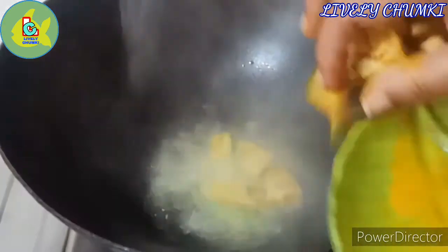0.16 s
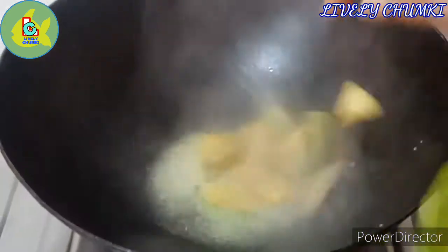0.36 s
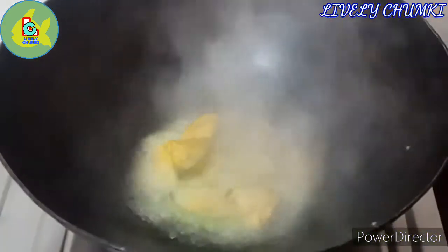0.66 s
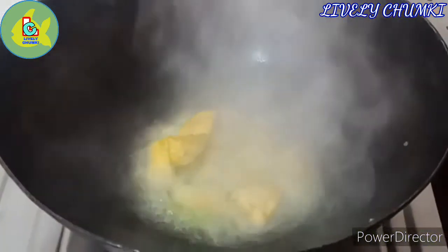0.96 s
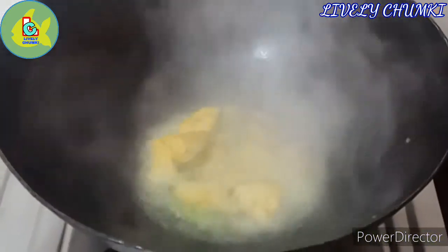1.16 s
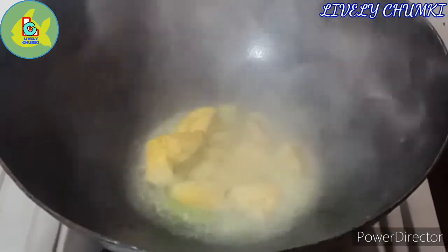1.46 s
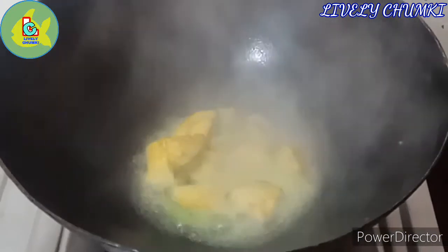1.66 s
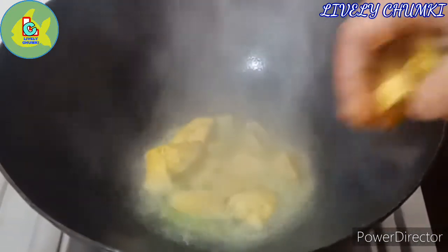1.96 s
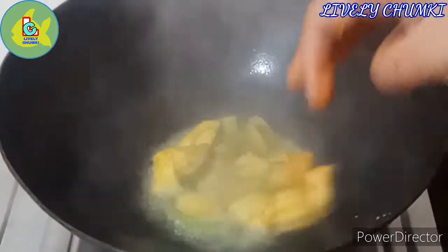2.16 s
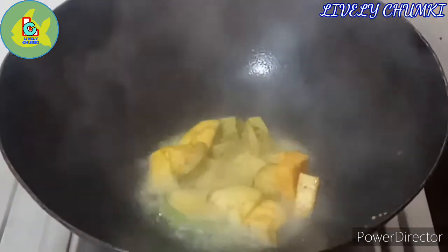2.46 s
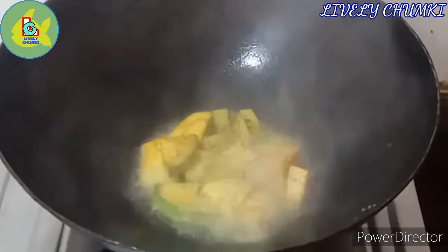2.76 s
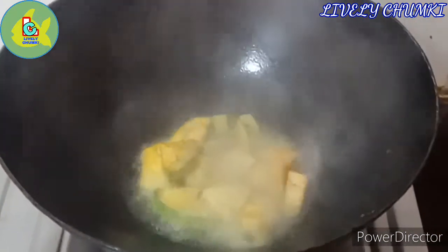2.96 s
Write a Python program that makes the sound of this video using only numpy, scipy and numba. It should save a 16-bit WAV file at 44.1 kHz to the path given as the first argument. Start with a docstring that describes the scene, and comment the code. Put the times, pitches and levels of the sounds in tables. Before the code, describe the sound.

Hot oil frying vegetable cubes in a wok, a close, even, high hiss.

```python
"""Vegetables frying in a wok

Vegetable cubes fry in hot oil, close to a phone in a small kitchen. Thousands of steam bubbles
burst and ring each second; the wok colours them and the room smears them into an even hiss
that flares as wet faces meet the oil. One piece lands with a dull knock, and a faint low
rumble comes and goes underneath."""
import sys
import numpy as np
from scipy import signal
from scipy.fft import rfft, irfft, next_fast_len
from scipy.io import wavfile
from numba import njit

SR = 44100
rng = np.random.default_rng(int(sys.argv[2]) if len(sys.argv) > 2 else 0)


def generate_wav(signal):
    """Clip the signal to [-1, 1] and save it as 16-bit WAV at the path in sys.argv[1]."""
    frames = np.transpose(np.atleast_2d(signal))
    scaled = np.clip(frames, -1, 1) * 32767
    pcm = np.round(scaled).astype(np.int16)
    wavfile.write(sys.argv[1], SR, pcm)


N = 136710
ROOM_T60_S = 0.17


def undb(db):
    """Decibels to gain."""
    return 10 ** (np.asarray(db) / 20)


def unit(x):
    """Scale to rms 1."""
    return x / np.sqrt(np.mean(x ** 2))


def curve(rows):
    """Join (seconds, value) points with straight lines."""
    return np.interp(np.arange(N) / SR, *np.array(rows).T)


def swells(rows):
    """Sum of bell-shaped bumps, each given as centre in seconds, half-width in seconds, height."""
    t = np.arange(N) / SR
    return sum(height * np.exp(-((t - centre) / width) ** 2) for centre, width, height in rows)


def shape(x, response):
    """Filter by a response given as a function of frequency."""
    size = next_fast_len(N + 8192)
    hz = np.maximum(np.fft.rfftfreq(size, 1 / SR), 1)
    return irfft(rfft(x, size) * response(hz), size)[..., :N]


def colour(x, hz, db):
    """Equalise through (Hz, dB) points on a log-frequency axis."""
    return shape(x, lambda f: undb(np.interp(np.log(f), np.log(hz), db)))


def wander(rate_hz):
    """Smooth random drift with rms 1."""
    return unit(shape(rng.standard_normal(N), lambda f: np.exp(-2 * (f / rate_hz) ** 2)))


def kitchen(x, wet_db):
    """The small room adds a short diffuse tail, different on each side."""
    t = np.arange(SR // 2) / SR
    tail = rng.standard_normal((2, len(t))) * np.exp(-np.log(1000) * t / ROOM_T60_S)
    tail[:, :8] = 0  # reflections follow the direct sound
    tail /= np.sqrt(np.sum(tail ** 2, axis=1, keepdims=True))
    return x + undb(wet_db) * signal.fftconvolve(x, tail, axes=1)[:, :N]


def scatter(per_second, spread_db=2):
    """Random events across the oil: left and right arrival times, and sizes, mostly small."""
    start = np.flatnonzero(rng.random(N) < per_second / SR) / SR
    left_lag_s = rng.normal(0.00006, 0.00012, len(start))
    strength = np.minimum(rng.exponential(size=len(start)), 6.5)
    return (start + left_lag_s, start), undb(spread_db * strength)


def bursts():
    """Tiny steam pockets snap open, each a single click."""
    arrivals, size = scatter(per_second=28000)
    clicks = size * np.sign(rng.standard_normal(len(size)))
    samples = np.rint(np.array(arrivals) * SR).astype(int) % N
    return unit(np.array([np.bincount(side, clicks, N) for side in samples]))


@njit
def chirps(start, hz, size, t60, rise):
    """Decaying sines whose pitch climbs by the fraction `rise` as they die away."""
    out = np.zeros(N)
    for k in range(len(start)):
        first = int(start[k] * SR) + 1
        for i in range(max(first, 0), min(first + int(t60 * SR), N)):
            age = i / SR - start[k]
            phase = 2 * np.pi * hz[k] * age * (1 + .5 * rise * age / t60)
            out[i] += size[k] * np.exp(-6.9 * age / t60) * np.sin(phase)
    return out


def bubbles():
    """Bubbles ring for a few milliseconds, each at its own pitch."""
    arrivals, size = scatter(per_second=5000)
    hz = rng.uniform(1606, 15240, len(size))
    return unit(np.array([chirps(start, hz, size, t60=0.01, rise=0.12) for start in arrivals]))


def wok(x):
    """The wok's resonances colour the frying."""
    # Each row: pitch in Hz, bandwidth in Hz, level in dB against the incoming hiss.
    resonances = [(413, 7.1, 2.5), (547, 29, 1.5), (657, 26, -0.5), (786, 20, -12), (876, 44, -5.5),
                  (1065, 21, -8), (1470, 36, -3.5), (1815, 15, -19), (2930, 49, -1), (4400, 19, -15)]
    return shape(x, lambda f: 1 + sum(undb(db) / (1 + 2j * (f - hz) / width)
                                      for hz, width, db in resonances))


def flares(hiss):
    """Wet faces meet the oil and a bright band of the hiss flares up."""
    # Each row: peak time in seconds, half-width in seconds, boost in dB.
    boosts = [(.27, .03, 1), (.595, 0.069, 6), (1.66, 0.058, 1), (2.32, .08, 2)]
    centre_hz, half_width_hz = 4260, 1120
    band = shape(hiss, lambda f: np.exp(-((f - centre_hz) / half_width_hz) ** 2))
    return band * (undb(swells(boosts)) - 1)


def sizzle():
    """Bursts and bubbles sound through the wok and the kitchen, surging with the boil."""
    # Tone of the hiss. Each row: frequency in Hz, relative left and right levels in dB.
    tone = [(150, -38.5, -38.5), (455, -39.5, -35.5), (662, -26.5, -28), (1050, -25, -23.5),
            (1460, -25.5, -25.6), (1830, -20, -19.5), (2610, -18.5, -17), (3140, -16.5, -15),
            (3660, -14, -10.5), (4750, -9.5, -9), (5470, -13, -5), (6510, -10.5, 0.4), (7200, -19, -9),
            (8400, -17.5, -21), (9670, -18, -26.5), (11940, -13, -23.5), (13570, -18, -17.5),
            (15170, -7.5, -3), (14700, -9, -6.5)]
    # Strength of the frying. Each row: time in seconds, gain in dB.
    boil = [(0, 1.4), (.27, 1.3), (.36, 0.1), (.56, 1), (.72, 1.3), (1.12, 1.83), (1.3, 0.66), (1.65, 1.06),
            (2.15, 0.75), (2.33, 1.1), (2.55, 0.3), (2.85, -0.5), (3.1, -0.2)]
    # Treble against the body of the hiss. Each row: time in seconds, gain in dB.
    treble = [(0, -2.5), (.25, -0.8), (.45, 0.7), (1, 0.7), (1.7, 0), (2.35, -0.4), (2.65, 2), (2.85, 0.5),
              (3.1, 2.5)]
    # The level dips briefly. Each row: time in seconds, depth in dB.
    dips = [(.088, 4.5), (1.195, 2.5), (2.18, 0.5), (2.478, 2.5), (2.93, 0)]
    level_db, treble_hz, dip_half_width_s = -19, 8300, 0.02
    oil = bursts() + undb(-4.5) * bubbles()
    left, right = wok(kitchen(oil, wet_db=-5.5))
    hz, left_db, right_db = np.array(tone).T
    hiss = unit(np.array([colour(left, hz, left_db), colour(right, hz, right_db)]))
    body = shape(hiss, lambda f: 1 / (1 + (f / treble_hz) ** 10))
    flicker_db = 0.4 * wander(rate_hz=45)
    fizz = (hiss - body) * undb(curve(treble) + flicker_db)
    dip_db = swells([(time, dip_half_width_s, depth) for time, depth in dips])
    surge_db = 0.43 * wander(rate_hz=30)
    return (body + fizz + flares(hiss)) * undb(level_db + curve(boil) - dip_db + surge_db)


def rumble():
    """A faint low rumble swells into soft thuds, nearly alike on both sides."""
    # Tone of the rumble. Each row: frequency in Hz, relative level in dB.
    tone = [(20, -24), (50, -12.5), (72, -11), (92, -5.5), (107, 6), (122, -12.5), (137, -1), (160, -15.5),
            (200, -10), (300, -9.5), (450, -21), (900, -28.5)]
    # Soft thuds. Each row: peak time in seconds, half-width in seconds, level in dB.
    thuds = [(.01, 0.0095, -45), (0.144, 0.034, -48), (0.355, 0.064, -52), (0.468, 0.036, -49.5),
             (1.053, 0.021, -63), (1.4, .04, -58), (1.83, 0.015, -47), (1.946, 0.013, -49),
             (2.068, 0.016, -50.5), (2.308, 0.095, -49.5), (2.59, 0.011, -50), (2.786, 0.072, -53),
             (2.935, 0.038, -53.5)]
    bed_db, side_db = -62, -14.5
    mid, side = unit(colour(rng.standard_normal((2, N)), *np.array(tone).T))
    thud_power = swells([(time, width, undb(db) ** 2) for time, width, db in thuds])
    envelope = np.sqrt(undb(bed_db) ** 2 + thud_power)
    return envelope * (mid + undb(side_db) * np.array([side, -side]))


def knock():
    """A soft cube strikes the wok, whose ring the oil and food damp quickly."""
    # The piece lands and tumbles. Each row: start in seconds, strength in dB.
    hits = [(0.2608, -32), (0.2729, -41), (0.2864, -45)]
    # Modes of the struck wok. Each row: pitch in Hz, relative level in dB, seconds to fall 60 dB.
    modes = [(274, -10, 0.089), (400, -4.5, 0.1), (600, -5, 0.097), (710, -0.5, 0.048), (810, 4.5, 0.024),
             (1023, -3.5, 0.093), (1140, -20, .03)]
    ring = np.zeros(N)
    for start, hit_db in hits:
        age = np.maximum(np.arange(N) / SR - start, 0)
        for hz, db, t60 in modes:
            decay = np.exp(-np.log(1000) * age / t60)
            ring += undb(hit_db + db) * np.sin(2 * np.pi * hz * age) * decay
    dull = signal.sosfilt(signal.butter(2, [272, 1400], "bandpass", fs=SR, output="sos"), ring)
    return kitchen(np.array([dull, dull]), wet_db=-5)


def scene():
    """The sizzle up front, with the rumble and the landing piece beneath it."""
    return sizzle() + rumble() + knock()


def record(dry):
    """The phone cuts the top end steeply."""
    top_hz = 15480
    return shape(dry, lambda f: undb(-np.clip((f - top_hz) / 5, 0, 100)))


dry = scene()
out = record(dry)
generate_wav(out)
```